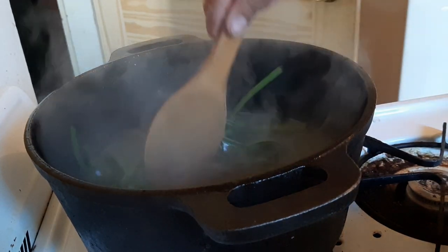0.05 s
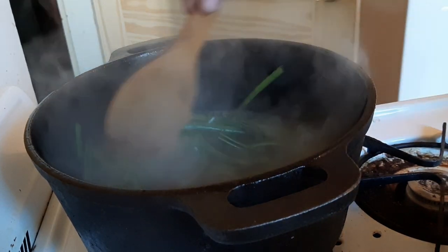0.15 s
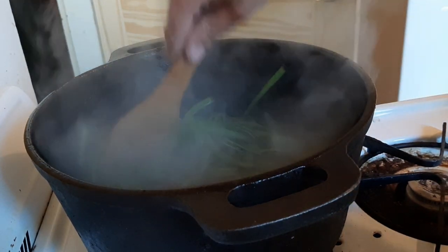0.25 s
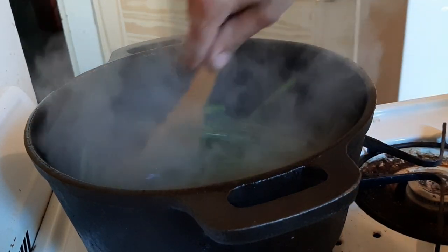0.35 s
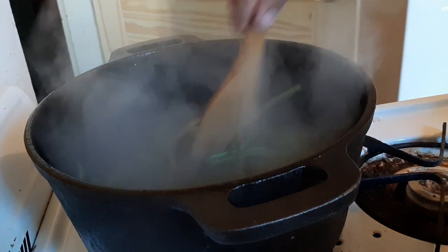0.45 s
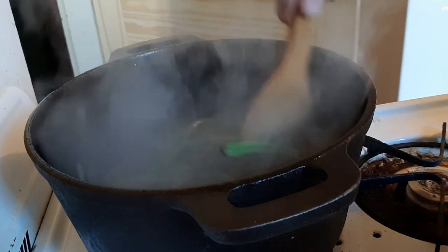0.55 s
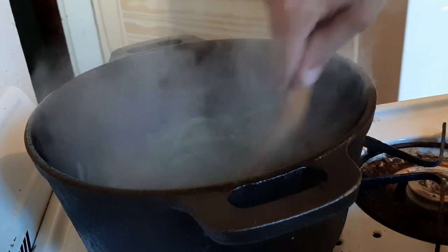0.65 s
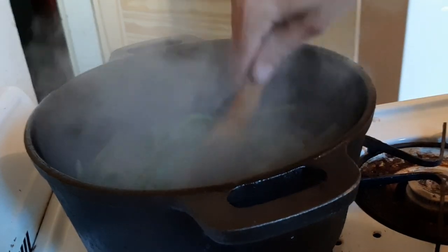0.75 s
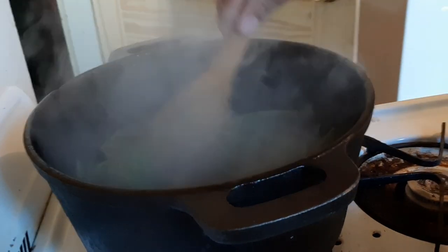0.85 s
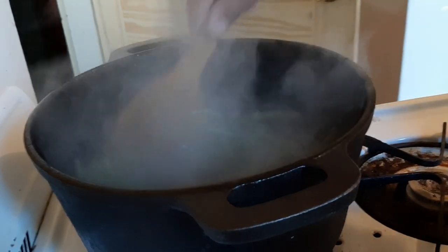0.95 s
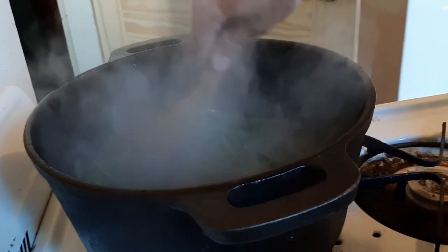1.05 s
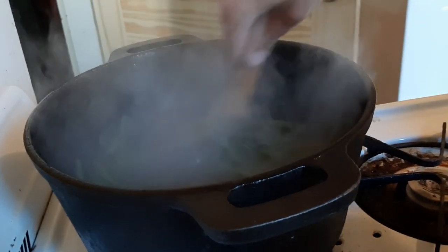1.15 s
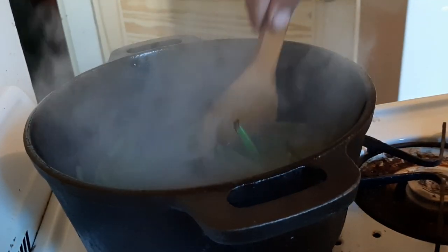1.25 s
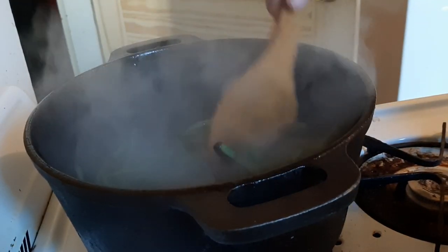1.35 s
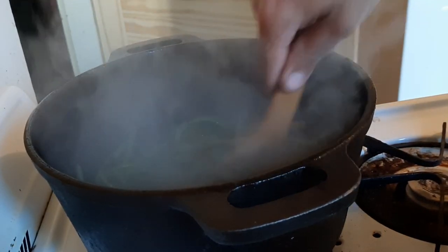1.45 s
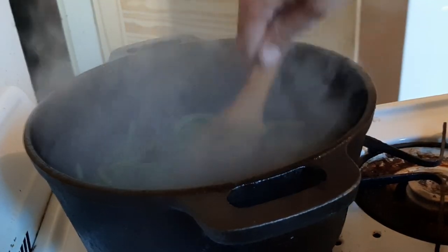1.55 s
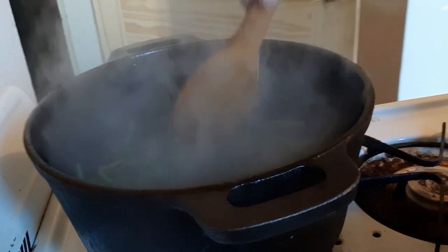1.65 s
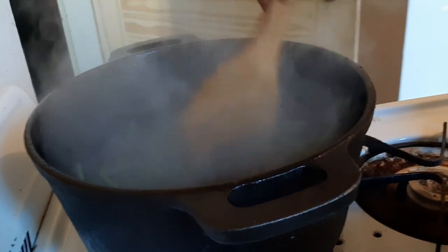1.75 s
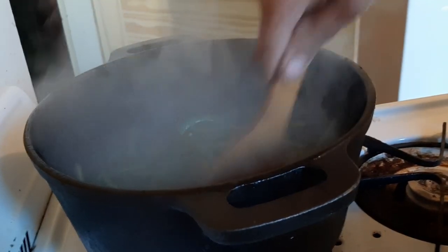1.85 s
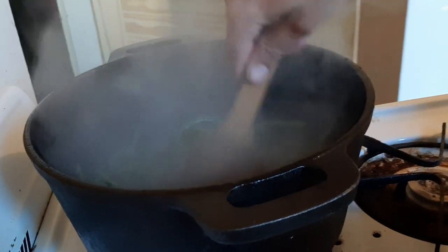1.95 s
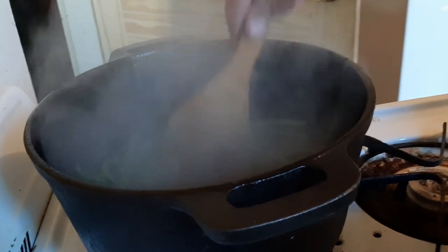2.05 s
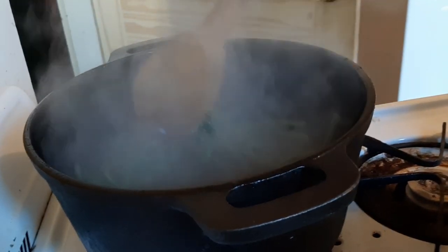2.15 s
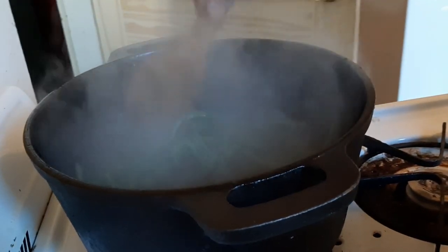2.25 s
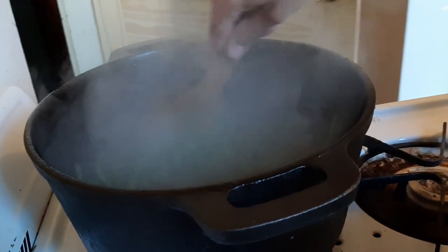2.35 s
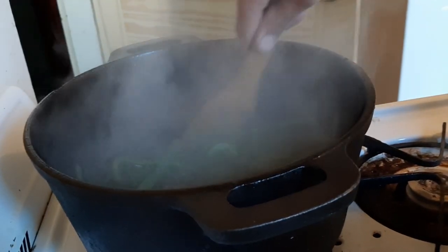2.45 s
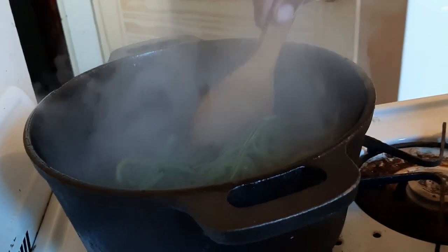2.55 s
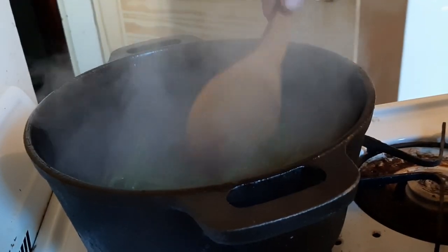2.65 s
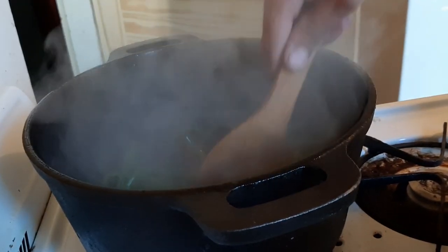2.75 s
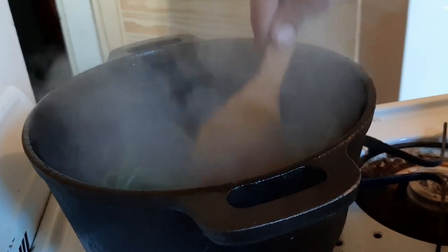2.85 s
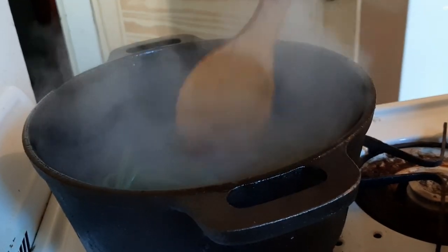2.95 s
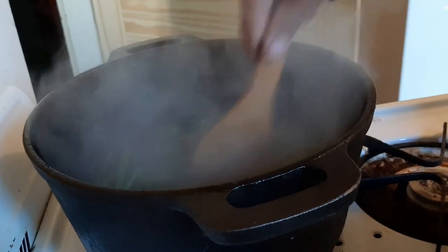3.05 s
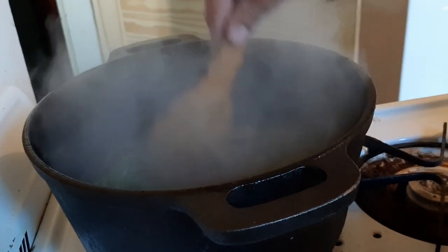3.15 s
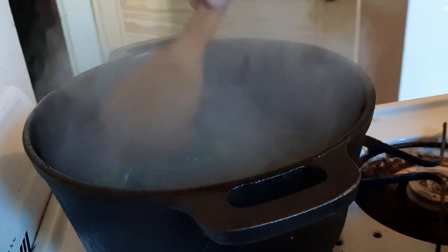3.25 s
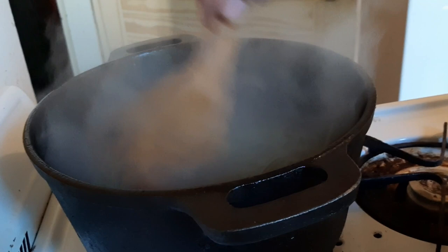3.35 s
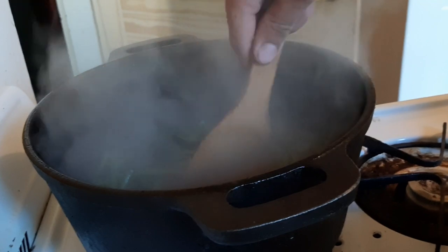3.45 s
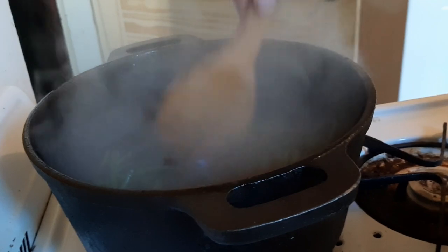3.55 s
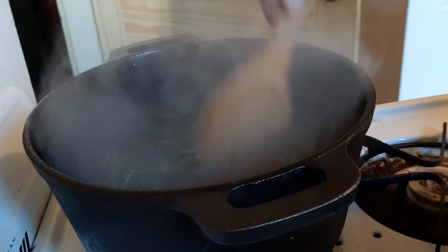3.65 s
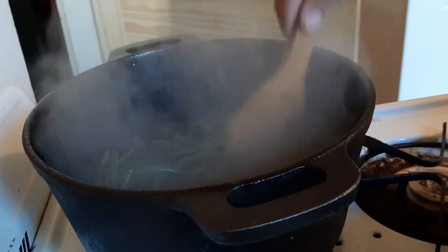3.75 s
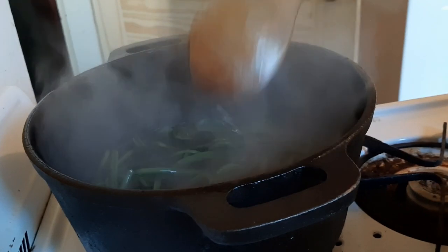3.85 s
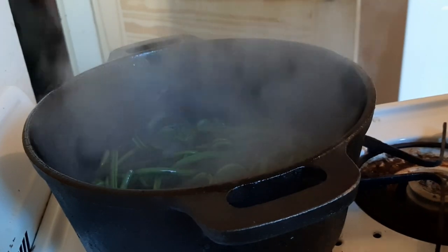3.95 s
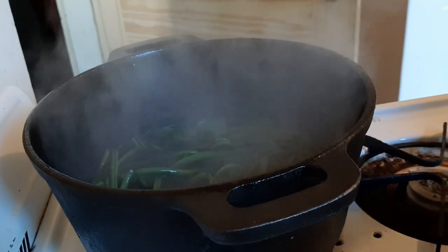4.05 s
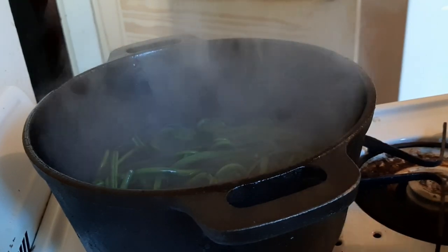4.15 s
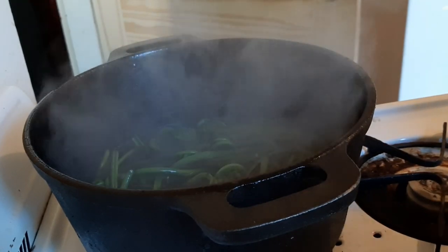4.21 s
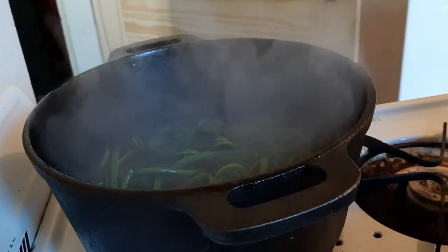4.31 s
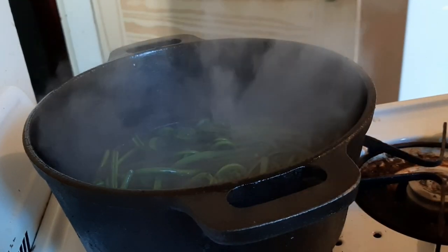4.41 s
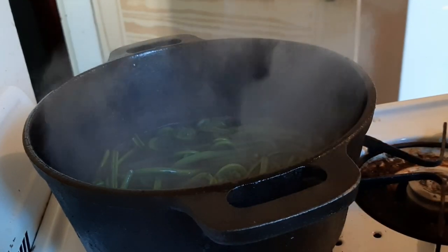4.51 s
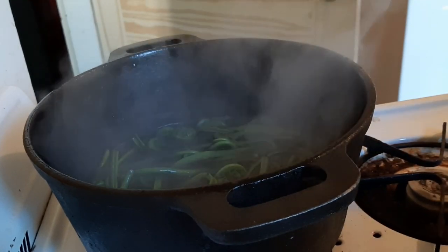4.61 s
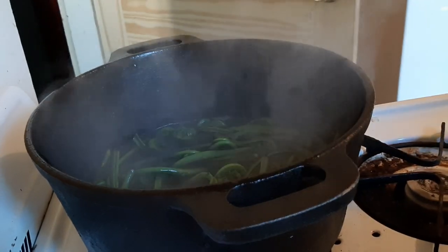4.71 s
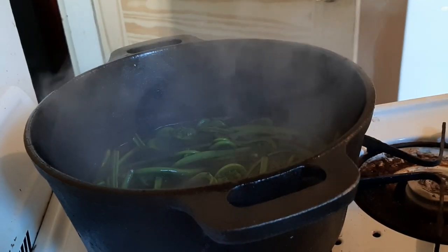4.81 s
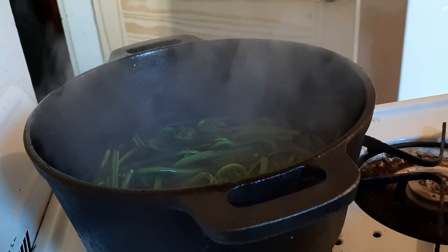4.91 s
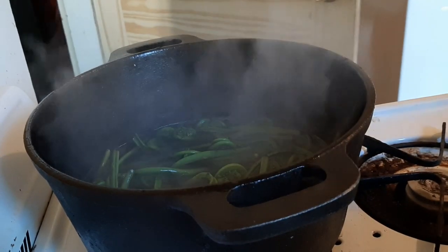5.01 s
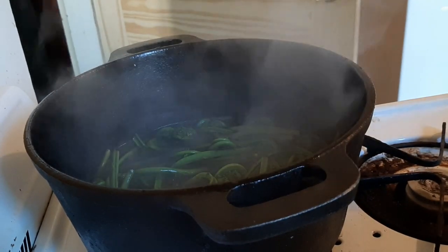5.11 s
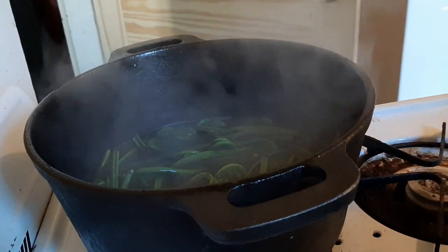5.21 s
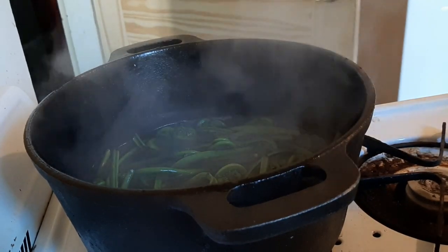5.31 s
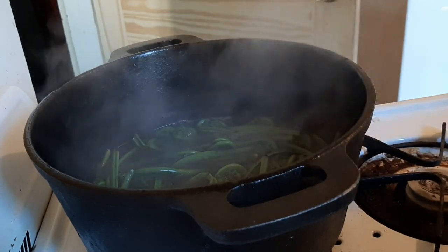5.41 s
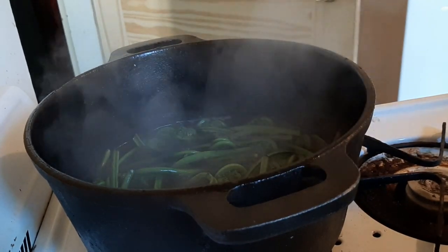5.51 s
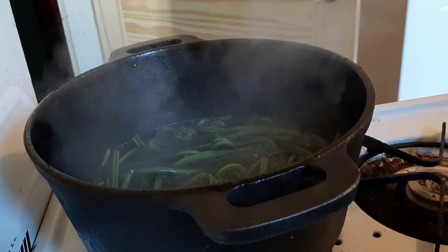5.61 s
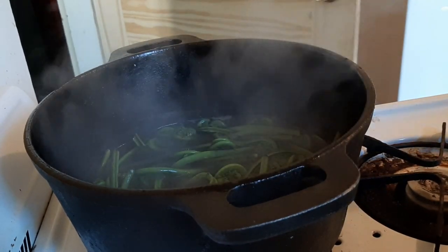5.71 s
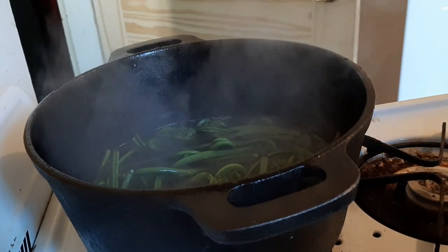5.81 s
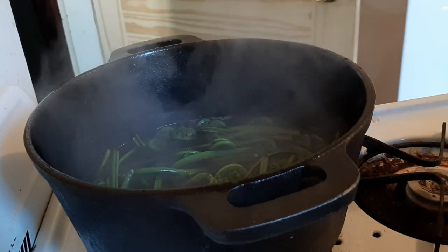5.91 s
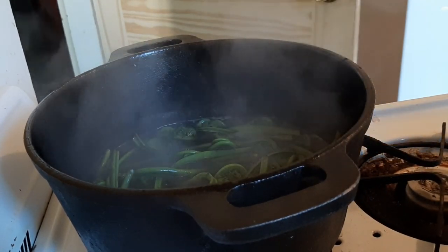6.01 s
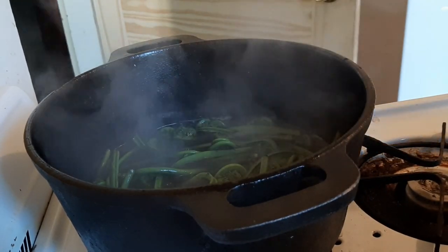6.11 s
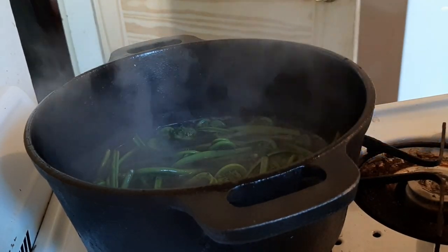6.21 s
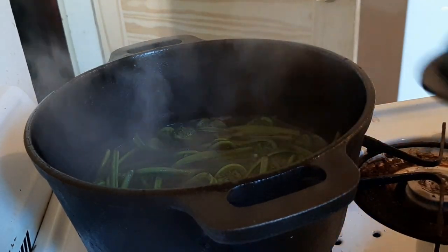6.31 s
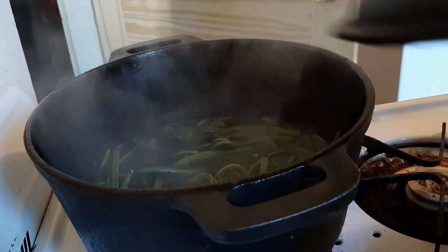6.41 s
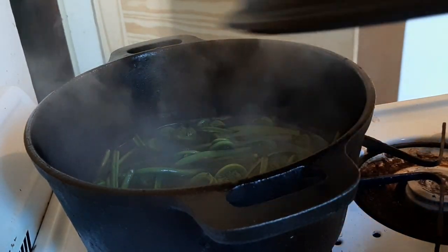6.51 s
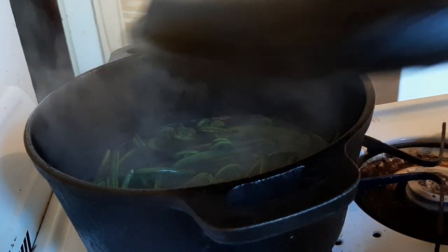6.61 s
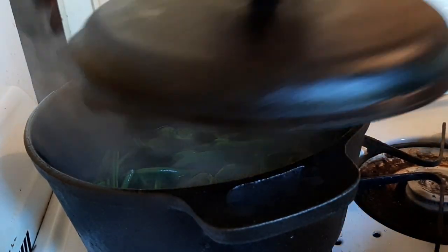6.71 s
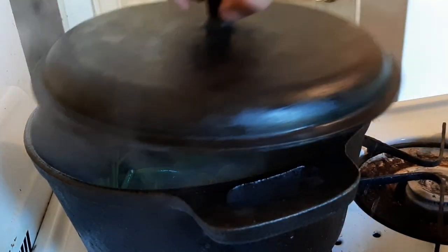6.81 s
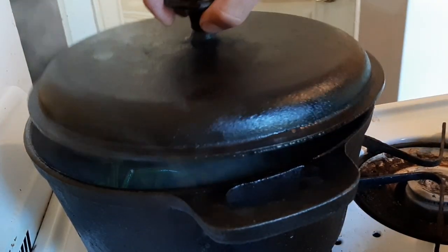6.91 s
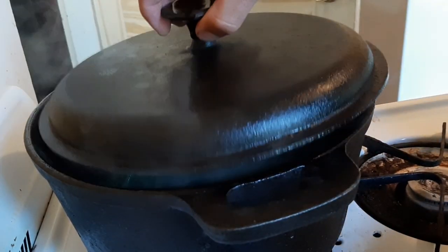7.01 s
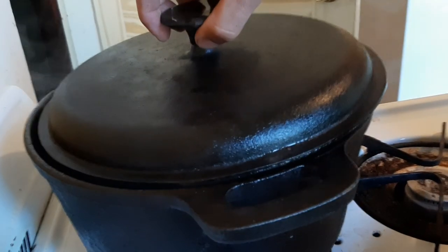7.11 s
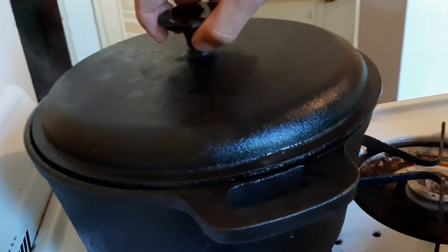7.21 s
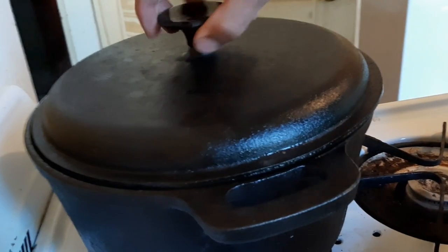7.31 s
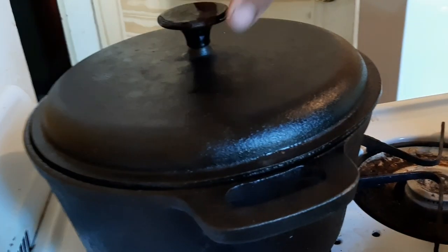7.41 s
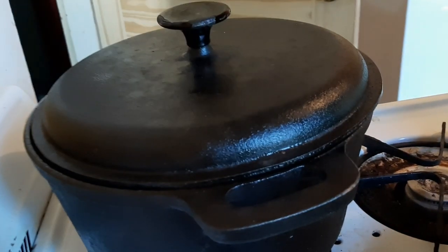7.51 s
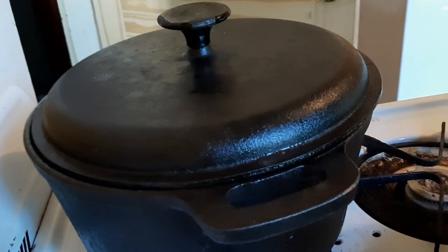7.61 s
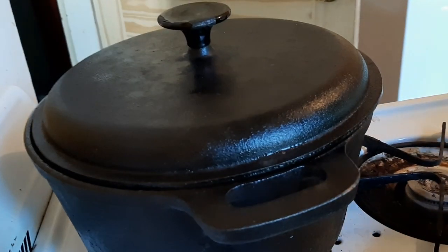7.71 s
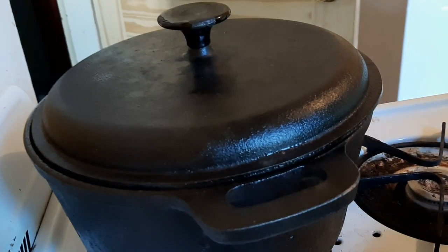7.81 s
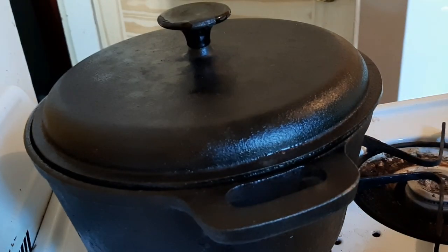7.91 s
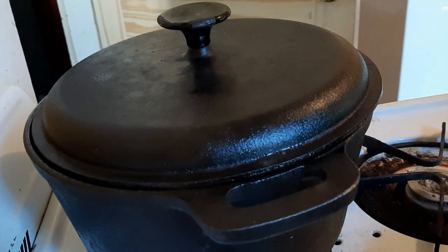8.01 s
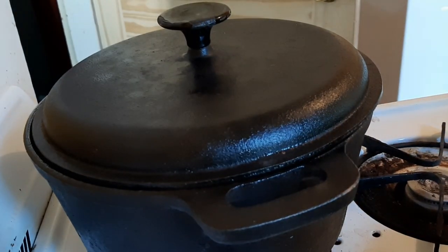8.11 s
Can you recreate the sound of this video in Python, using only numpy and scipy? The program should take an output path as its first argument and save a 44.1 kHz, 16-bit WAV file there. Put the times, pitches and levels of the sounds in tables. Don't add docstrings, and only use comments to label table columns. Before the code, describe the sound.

A close stereo view of a stove in a small, lightly echoing kitchen, with a steady low fan hum, soft rumble and airy simmer. From 0 to about 1 second a wooden spatula rasps over the floor of a cast iron pot, with hollow bumps near 0.8 and a faint squeak just before. At 1.1 a sharp, loud rim knock cracks. Rough scrapes and dull thuds return at 1.5 to 2.1, then a second, brighter rim knock at 2.3. Small wooden ticks and faint wet rustles continue until 3.8. Then mostly hum and simmer until a woody clack on the counter at 5.4. At 6.9 an iron lid touches lightly and rings, then clanks hard twice around 7.1, chatters quickly and seats by 7.3. A short metallic ring fades, the simmer is muffled, and quiet hum remains, with a tiny tick near 8.1.

```python
import sys
import numpy as np
from scipy import signal
from scipy.fft import rfft, irfft
from scipy.io import wavfile
from scipy.ndimage import uniform_filter1d

SR = 44100
rng = np.random.default_rng(int(sys.argv[2]) if len(sys.argv) > 2 else 0)


def decibels_to_gain(level_db):
    exponent = np.asarray(level_db, float) / 20
    return 10 ** exponent


def unload_audio(sound):
    columns = np.transpose(np.atleast_2d(sound))
    steps = np.round(np.clip(columns, -1, 1) * 32767)
    wavfile.write(sys.argv[1], SR, steps.astype(np.int16))


N = 359856

# frequency in Hz, likeness from 0 to 1.
PORT_LIKENESS = [(60, .95), (140, .98), (290, .7), (640, .25), (1400, .02), (15000, .01)]
# start in seconds, peak in dB, ring in dB, rattle decay in seconds, left over right in dB.
HARD_BLOWS = [
    (1.13, -3, -9.5, 0.0085, -4.5),
    (2.315, -11, -4, 0.0064, -3),
    (5.3659, -8, -9.5, 0.0068, -5),
    (6.939, -17, -6, 0.011, -3.5),
    (7.0864, -3, -6.5, 0.007, -1.5),
    (7.153, -3, -4, 0.0079, -3.5),
]
LID_MODE_HZ = [207, 6900, 622, 815, 940, 1019, 1270, 1465, 1525, 1733, 1869, 2076, 2429, 2592, 2756, 2895,
               7750, 3736, 4076, 4380, 4820, 5400, 5540, 6191, 3150, 3345, 5430, 6790, 7120]
# free T60 in seconds, then level in dB after the first touch,
# after the first clank, after the second clank, and under the rattle.
LID_MODE_LEVELS = [(0.57, -1.5, -4.5, -8, -9), (0.35, -19.5, -27, -23, -21), (0.39, -9, -12.5, -6, -23.5),
                   (0.56, -36, -25, -20.5, -10.5), (0.2, -33, -28, -10, -6.5), (3.1, -14.5, -4, -19, -14),
                   (0.13, -32.5, -16.5, 3.5, 0), (0.23, -16.5, -9.5, -19, 0), (0.18, -25.5, -36, -24, -11),
                   (0.62, -6, -4.5, -17.5, -3.5), (0.26, -3.5, -6, -1.5, 2.5),
                   (0.59, -12, -6.5, -6.5, -0.5), (1.5, -10.5, -9.5, -6, -24), (0.29, -30.5, -16.5, -2, -7),
                   (0.072, -28.5, -30.5, 8, -12), (1.5, -9.5, -13, -8, -6.5),
                   (.3, -43.5, -32.5, -29.5, -40.5), (1.1, -24.5, -19.5, -25.5, -32),
                   (0.33, -13, -16, -11.5, -11.5), (0.32, -19, -20, -12.5, -23),
                   (0.24, -24, -27.5, -7.5, -14.5), (0.21, -15, -16.5, -24.5, -27),
                   (0.25, -38, -25.5, -18.5, -22), (0.17, -42.5, -32, -28, -24.5),
                   (0.13, -29, -5, -13, -17), (0.34, -28.5, -14.5, -15, -14), (0.22, -36, -27, -16, -33),
                   (0.28, -35.5, -31.5, -34, -36), (.2, -39.5, -29, -32.5, -32)]


def evened(x):
    return x / np.sqrt(np.mean(x ** 2) + 1e-20)


def read(points, hz):
    f, value = np.transpose(points)
    return np.interp(np.log(hz + 1), np.log(f + 1), value)


def envelope(rows):
    t = np.arange(N) / SR
    s, db = np.transpose(rows)[[0, -1]]
    edge = np.clip(np.minimum(t - s[0], s[-1] - t) / 0.01, 0, 1)
    return decibels_to_gain(np.interp(t, s, db)) * edge


def swells(rows, rise):
    s, db, fade = np.transpose(rows)[..., None]
    late = np.arange(0, N + 64, 64) / SR - s
    elapsed = np.where(late > 0, late, -late / abs(rise))
    gain = decibels_to_gain(db - 20 * elapsed / np.maximum(fade, .01)).sum(0)
    return np.interp(np.arange(N) / 64, np.arange(len(gain)), gain)


def add(mix, s, sound):
    part = mix[..., round(s * SR):][..., :sound.shape[-1]]
    part += sound[..., :part.shape[-1]]


def click(points):
    gain_db = np.maximum(read(points, abs(np.fft.fftfreq(4096, 1 / SR))), -100)
    spectrum = np.exp(np.conj(signal.hilbert(np.log(decibels_to_gain(gain_db)))))
    taps = np.fft.ifft(spectrum).real[:2048]
    return taps / np.linalg.norm(taps)


def whitened(x):
    spec = rfft(x)
    power = uniform_filter1d(abs(spec) ** 2, size=61, mode="mirror")
    even = irfft(spec / np.sqrt(power + 1e-12), x.shape[-1])
    return even[:, :x.shape[-1] // 2]


def resonate(x, hz, width):
    r = np.exp(-np.pi * width / SR)
    return 2 * signal.lfilter([1 - r], [1, -r * np.exp(2j * np.pi * hz / SR)], x).real


def grit(per_s, spread_db):
    size = decibels_to_gain(spread_db * np.minimum(rng.exponential(1, N), 4)) * rng.choice([-1, 1], N)
    return evened(size * (rng.random(N) < per_s / SR))


def ring(modes, length, port_hz=900):
    t = np.arange(round(length * SR)) / SR
    hz, db, t60 = np.transpose(modes)[..., None]
    scatter = rng.uniform(-.6, .6, hz.shape) * np.pi * np.clip(hz / port_hz - .5, 0, 1)
    lag = 2 * np.pi * hz * 5 / SR + scatter
    decay = decibels_to_gain(db - 60 * t / t60)
    return np.array([(decay * np.sin(2 * np.pi * hz * t + phase)).sum(0) for phase in (0, lag)])


def stirring():
    # frequency in Hz, level in dB per Hz.
    rustle_colour = [(350, -30.5), (643, -3), (1510, -10), (2240, -8), (6030, -14.5), (8740, -14),
                     (11200, -15.5), (16000, -30.5)]
    # frequency in Hz, width in Hz, level in dB.
    floor_body = [(227, 70, 5.5), (280, 41, -1), (400, 80, 5.5), (648, 62, 2), (780, 58, -4.5),
                  (1530, 22, -7)]
    # peak in seconds, level in dB, seconds to fade 20 dB.
    drag_strokes = [(0.0, -46.5, 1.4), (.256, -27.5, -1.5), (.788, -26.5, 0.17), (.878, -40.5, -1.46),
                    (1.622, -22.5, 0.07), (1.986, -24, 0), (2.38, -48.5, 4)]
    # peak in seconds, level in dB, seconds to fade 20 dB.
    slow_pushes = [(0.282, -45.5, 0.25), (.55, -59.5, -6), (0.848, -60, 0.5), (1.06, -59, -1.5),
                   (1.91, -54, 0), (2.026, -54, 0.34), (2.778, -57.5, 0.18), (3.514, -49, -1),
                   (4.116, -65.5, 0.14), (5.136, -59, 0.5)]
    # peak in seconds, level in dB, seconds to fade 20 dB.
    quick_flicks = [(0.0, -52, 0.17), (.63, -60.5, 0.13), (1.612, -69, 0.4), (2.088, -45, 0.015),
                    (2.912, -65, 0.095), (3.124, -52, 0.37), (3.294, -56.5, 0.012), (3.46, -51.5, 0.15),
                    (3.734, -48, 0.085), (7.826, -58.5, 0.058), (1.725, -53, .03), (.98, -59, 0.038)]
    # peak in seconds, level in dB, seconds to fade 20 dB.
    wall_squeaks = [(.725, -55.5, 0.074), (.76, -62, .07)]

    crackle = np.array([grit(5500, 2.3), grit(5000, 5.0)])
    rustle = signal.oaconvolve(crackle, click(rustle_colour)[None], axes=1)[:, :N]
    slips = grit(560, 2.7)
    body = 0
    for hz, width, db in floor_body:
        body = body + decibels_to_gain(db) * evened(resonate(resonate(slips, hz, width), hz, 4 * width))
    squeak = evened(resonate(rng.standard_normal(N), 1470, 41)) * swells(wall_squeaks, 0.43)
    greens = rustle * (swells(slow_pushes, 0.37) + swells(quick_flicks, 0.052))
    return squeak + greens + decibels_to_gain(-14.5) * evened(body) * swells(drag_strokes, 0.3)


def touches():
    # start in seconds, peak in dB, ring in Hz, treble tick in dB.
    light_touches = [(0.172, -41.5, 1350, -54), (0.3534, -59, 1550, -54), (0.98, -56, 1310, -44),
                     (1.0482, -47, 1580, -51), (1.887, -48.5, 1614, -69), (1.96, -46, 1150, -66),
                     (1.981, -34, 1210, -62), (1.99, -33, 1090, -49), (1.999, -37, 1410, -49),
                     (2.029, -35, 2110, -43.5), (2.035, -40, 1360, -58), (2.06, -46, 4050, -60),
                     (1.613, -42, 2350, -62), (1.681, -48, 2340, -62), (2.093, -49, 4240, -60),
                     (2.093, -39, 1980, -56), (2.261, -44.5, 1315, -59), (2.273, -60, 1530, -48),
                     (2.374, -68, 1530, -35), (2.4178, -44, 1530, -41), (2.642, -49, 880, -63),
                     (2.773, -49, 1360, -53), (2.801, -45, 1210, -47), (2.9108, -42, 1056, -69),
                     (3.0886, -40.5, 3040, -64), (3.12, -28.5, 3790, -49), (3.121, -41.5, 2030, -64),
                     (3.13, -37, 3570, -52), (3.148, -43, 2010, -55), (3.187, -47, 1060, -62),
                     (3.238, -56, 2000, -47), (0.781, -40, 830, -51), (8.07, -68.5, 1400, -51.5),
                     (3.158, -37, 4000, -37), (3.2246, -42, 2020, -45), (3.29, -53, 2030, -44),
                     (3.457, -30.5, 1674, -69), (3.458, -37.5, 1138, -65), (3.455, -43, 3050, -66),
                     (3.464, -41, 1170, -68), (3.484, -47, 1680, -54), (3.531, -54, 2800, -43),
                     (3.5081, -37, 2710, -39), (3.736, -42, 2970, -46), (3.742, -36.5, 5100, -52),
                     (3.756, -52, 2800, -62), (3.775, -52, 3300, -58), (3.742, -35.5, 1086, -44),
                     (8.069, -63.5, 1410, -51.5)]
    wall_hz, wall_width_hz = 1530, 68
    out, t = np.zeros((2, N)), np.arange(4000) / SR
    lags = rng.uniform(-1.3, 0.94, len(light_touches))
    for (s, db, hz, tick_db), lag in zip(light_touches, lags):
        t60 = 0.018 + 0.065 / (1 + ((hz - wall_hz) / wall_width_hz) ** 2)
        t60 = max(t60 * min(1600 / hz, 1) ** 0.23, .003)
        tone = np.sin(2 * np.pi * hz * t + [[0], [lag]])
        octave = 0.21 * np.sin(2 * np.pi * 2.0 * hz * t)
        tock = decibels_to_gain(db - 60 * t / t60) * (tone + octave)
        noise = rng.standard_normal((2, len(t))) ** 3 / 4
        tick = signal.lfilter([1, -1], [1, -1.2, .6], noise) * decibels_to_gain(tick_db - 60 * t / 0.0068)
        add(out, s, tock + tick)
    return out


def bumps():
    # start in seconds, peak in dB, hardness in dB added above 500 Hz.
    floor_bumps = [(0.781, -35, 22), (0.794, -21, -12), (0.807, -43, -15), (0.824, -41, -8),
                   (.836, -30, -4), (0.869, -19.5, -22), (0.88, -33, 4), (1.511, -34, -13.5),
                   (1.574, -23, -33), (1.59, -35, 12), (1.611, -24.5, 3), (1.63, -20.5, -23),
                   (1.647, -41, -19), (1.679, -17.5, -13.5), (1.69, -21.5, -2), (1.701, -31, -17),
                   (1.72, -58, -19), (1.984, -30.5, -7), (2.03, -35, -5), (3.742, -37, -2)]
    # frequency in Hz, level in dB, T60 in seconds.
    floor_modes = [(220, 10, 0.03), (307.4, -12, 0.021), (394, -4, 0.15), (605, 5.5, 0.068),
                   (812.4, 2, 0.073), (1040, -14.5, 0.044), (1730, -10, 0.032), (2317, -11.5, 0.071)]
    out, (hz, db, t60) = np.zeros((2, N)), np.transpose(floor_modes)
    spots_db = rng.normal(0, 2.5, (len(floor_bumps), len(hz)))
    for (s, peak_db, hard_db), spot_db in zip(floor_bumps, spots_db):
        mode_db = db + spot_db + (hz > 500) * hard_db
        thud = ring(np.column_stack([hz, mode_db, t60]), .25)
        soft = np.minimum(np.arange(thud.shape[1]) / SR / 0.009, 1)
        add(out, s, decibels_to_gain(peak_db) * thud * soft / abs(thud).max())
    return out


def boom():
    # peak in seconds, level in dB, seconds to fade 20 dB.
    pot_rocks = [(.8, -39, 0.026), (.85, -48.5, 0.067), (2.378, -36.5, 0.034), (2.46, -45, 0.05)]
    tone = np.sqrt(2) * np.sin(2 * np.pi * 221 * np.arange(N) / SR)
    return tone * swells(pot_rocks, 1)


def blows():
    # frequency in Hz, level in dB per Hz.
    blow_colours = [
        [(60, -41), (360, -13), (560, -25), (800, -4), (1050, -14), (1500, 4), (2300, -2), (3300, -13),
         (6000, -26), (12000, -37), (16000, -51.5)],
        [(60, -16), (300, -10.5), (900, -17), (1500, -23.5), (1850, -3), (2200, 6.5), (2500, -1), (3200, -11.5),
         (4100, -4), (4700, -13), (5200, -16.5), (12500, -24), (16000, -29)],
        [(60, -44), (156, -10), (346, -5.5), (427, -0.5), (822, -6.5), (1150, -10.5), (1700, -4.5), (2600, -9),
         (3200, -14.5), (3900, -10.5), (5500, -14.5), (13000, -25), (16000, -48)],
        [(59, -45.5), (100, -1), (302, 1), (970, -14), (1420, 4), (2580, -26), (2930, -10.5), (6990, -33.5),
         (16000, -81.5)],
        [(59, -33.5), (100, -68.5), (373, -2.5), (721, -15), (1580, -3), (2270, -22), (2690, -5), (3540, -16),
         (6000, -32), (16000, -72)],
        [(59, -47.5), (100, -10), (381, -4), (854, -9.5), (1520, 6.5), (2220, -20), (2800, 2.5), (10700, -43.5),
         (16000, -96.5)],
    ]
    # frequency in Hz, level in dB, T60 in seconds.
    wooden_modes = [
        [(780, -5.5, 0.2), (830, -13.5, 0.11), (1410, 2, .12), (1506, 4, 0.18), (1646, -13, 0.067),
         (2070, -3, .07), (2164, 5.5, .06), (2380, -12, .06), (2580, -5.5, 0.051), (2800, -11, 0.12),
         (3348, -15, .1), (3800, -15.5, 0.061), (4547, -20, 0.075), (5255, -13, 0.074), (5970, -39, .08)],
        [(400, -3, .03), (1523, -14, 0.34), (2030, -11, 0.15), (2240, 0, 0.11), (2290, 11.5, 0.029),
         (2310, -3, 0.11), (2370, -12, .04), (2907, -1.5, .04), (3640, 3, .02), (3840, -13.5, .15),
         (4140, -11.5, 0.1), (4450, -11, .08)],
        [(105, -6, 0.64), (174.6, -2.5, 0.5), (255, -1.5, 0.8), (440, 5.5, 0.29), (545, -15, .15),
         (721, 4.5, 0.36), (828, 12, 0.23), (650, -16, 0.12), (347, -5, 0.14), (1210, -15, 0.22),
         (1580, -9, 0.1), (1590, 3, .07), (2350, -8, 0.07), (2570, 2, 0.06), (3850, 11, 0.068), (4300, -1, .07)],
    ]
    choke_times = [1.5, 2.7, 5.6, 7.085, 7.153, 7.29]
    # first contact over the rattle in dB, share sent to the walls in dB.
    contact_levels = [(10, -7), (12, -6), (-2, -2), (0, -6), (5, -9), (8, -9)]
    # delay in seconds, level in dB relative to the first contact.
    rebound_sets = [
        [(.0085, -10), (.0185, -15), (.027, -16.5)],
        [(.0095, -15.5), (.0245, -17.5), (.033, -8.5), (.038, -16.5)],
        [(.008, 1), (.019, -8), (.03, -6)],
        [(.004, -8.5)],
        [(.006, 1), (.013, -3), (.034, -9)],
        [(.003, -1.5), (.014, -5), (.021, -0.5)],
    ]

    out, t = np.zeros((2, 2, N)), np.arange(SR // 5) / SR
    free_t60 = np.array(LID_MODE_LEVELS)[:, 0]
    lid_modes = [np.column_stack([LID_MODE_HZ, np.array(LID_MODE_LEVELS)[:, k], free_t60])
                 for k in range(1, 4)]
    rows = zip(HARD_BLOWS, blow_colours, wooden_modes + lid_modes, choke_times,
               contact_levels, rebound_sets)
    for (s, db, ring_db, rattle, pan_db), colour, modes, end, (first_db, echo_db), rebounds in rows:
        sparse = rng.standard_normal((3, len(t))) * (rng.random(len(t)) < .15)
        both, left, right = sparse * np.exp(-t / max(rattle, .001))
        for delay, less_db in [(0.00056, 0.0056)] + rebounds:
            add(both, delay, decibels_to_gain(first_db + less_db) * np.hanning(8))
        burst = whitened(both + np.array([left, right]))
        crack = signal.fftconvolve(burst, click(colour)[None], axes=1)
        tone = ring(modes, end - s + .05)
        at = np.arange(tone.shape[1])
        tone *= np.clip((end - s - at / SR) / 0.0085 + 1, 0, 1) ** 2
        tone *= np.minimum(at / 14, 1)
        pan = decibels_to_gain([[pan_db / 2], [-pan_db / 2]]) * decibels_to_gain([[[0]], [[echo_db]]])
        add(out, s, pan * decibels_to_gain(db) * crack / abs(crack).max())
        add(out, s, pan * decibels_to_gain([[[0]], [[-6.0]]]) * decibels_to_gain(db + ring_db) * tone / abs(tone).max())
    return out


def lid():
    # time in seconds, pitch in Hz, level in dB.
    bell_path = [(6.95, 359.3, -49), (6.97, 358.7, -40.5), (7.1, 367.5, -23.5), (7.116, 345, -46),
                 (7.157, 374, -19.5), (7.213, 378.6, -33.5), (7.23, 359, -55)]
    # time in seconds, level in dB.
    chatter_level = [
        (7.165, -18),
        (7.201, -26),
        (7.229, -18.5),
        (7.27, -30.5),
        (7.33, -57.5),
    ]
    # frequency in Hz, level in dB per Hz.
    chatter_colour = [(47, -49), (100, -1), (150, -3.5), (230, 5), (702, -13), (1430, 0), (1900, -3.5),
                      (2270, -21.5), (2840, -17), (4940, -25), (5900, -35), (13400, -60)]
    # time in seconds, level in dB.
    clear_bounces = [(7.2116, 6.5), (7.218, -3), (7.2255, 7.5), (7.23, 4.5), (7.251, -12.5), (7.258, -7.5),
                     (7.232, 1), (7.24, -9), (7.268, -17.5), (7.29, -2.5)]
    # frequency in Hz, level in dB, T60 in seconds.
    lasting_modes = [(1725, -3, 0.9), (2427, 5, 0.52), (4820, -15.5, 0.42), (2895, -11.5, .45)]

    s, hz, _ = np.transpose(bell_path)
    pitch = np.interp(np.arange(N) / SR, s, hz)
    bell = np.sqrt(2) * np.sin(2 * np.pi * np.cumsum(pitch) / SR)
    bounces = grit(460, 1.7) + .5 * np.array([grit(500, 25.0), grit(410, 1.6)])
    bounces = bounces * envelope(chatter_level)
    for s, db in clear_bounces:
        add(bounces, s, decibels_to_gain(db) * np.ones((2, 1)))
    chatter = signal.oaconvolve(bounces, click(chatter_colour)[None], axes=1)[:, :N]
    held = [(f, row[-1], .2) for f, row in zip(LID_MODE_HZ, LID_MODE_LEVELS)]
    modes = ring(held, 0.17)
    modes = modes * np.minimum(np.arange(modes.shape[1]) / 16, 1)
    rung = signal.oaconvolve(bounces, modes / np.linalg.norm(modes[0]), axes=1)[:, :N]
    out = bell * envelope(bell_path) + decibels_to_gain(-4.0) * chatter + decibels_to_gain(-9.0) * rung
    tone = ring(lasting_modes, .9, port_hz=1e6)
    rise = np.minimum(np.arange(tone.shape[1]) / SR / 0.13, 1) ** 2
    add(out, 7.22, decibels_to_gain(-30.5) * tone * rise)
    return out


def rim():
    contact_db = [-61, -39, -45.5]
    # frequency in Hz, level in dB, T60 in seconds.
    touch_modes = [(7752, -49.5, 5.0), (8495, -8, 0.69), (10200, 10, 0.16), (10310, -13, 0.16),
                   (11990, -19, 5.0), (14630, -21, 0.77)]
    # frequency in Hz, level in dB, T60 in seconds.
    clank_modes = [(8549, -13, 0.13), (9388, -17.5, 3.2), (9679, -11.5, 0.36), (10200, -21, 5.0),
                   (10330, 0.5, 0.023), (10780, -13, 0.24), (11160, -10.5, 0.4), (12020, -3, 0.081),
                   (12300, -14.5, 0.12), (12930, -9, 0.12), (13090, -18, 0.23), (13820, -16, 0.33),
                   (14650, -18, 0.35)]
    # frequency in Hz, level in dB, T60 in seconds.
    seat_modes = [(7747, 0, 0.069), (8479, -28, 1.1), (9076, -34.5, 5.0), (9405, -29, 0.16),
                  (10170, 1.5, 0.079), (10740, 0, 0.23), (11200, -19, 0.91), (12130, -40.5, 5.0),
                  (12970, -8, 0.42), (13650, -18.5, 0.12), (13850, -24, 0.41), (14840, -18, 0.34),
                  (15140, -19, 0.21)]
    out = np.zeros((2, N))
    for (s, *_), level_db, modes in zip(HARD_BLOWS[3:], contact_db, (touch_modes, clank_modes, seat_modes)):
        tone = ring([(hz, db, min(t60, .22)) for hz, db, t60 in modes], .3)
        add(out, s, decibels_to_gain(level_db) * tone * np.minimum(np.arange(tone.shape[1]) / SR / .003, 1))
    return out


def hum_line(hz, db, width):
    sway, swell = (evened(uniform_filter1d(uniform_filter1d(v, 4000), 4000))
                   for v in rng.standard_normal((2, N)))
    phase = 2 * np.pi * np.cumsum(hz + width * sway) / SR
    return np.sqrt(2) * decibels_to_gain(db + 2.6 * swell) * np.sin(phase)


def air():
    # frequency in Hz, level in dB per Hz.
    air_colour = [(25, -42), (60, -12), (95, -16), (160, -17), (250, -13), (450, -22), (630, -29),
                  (1420, -32), (1550, -28), (1890, -38), (3500, -38), (5200, -36), (11300, -40),
                  (16000, -46)]
    # frequency in Hz, level in dB, pitch wander in Hz.
    fan_tones = [(131.7, -55, 3.7), (177, -69, 5), (243, -77.5, 3.3)]
    # peak in seconds, rumble in dB.
    leaning = [(0.32, -52.5), (0.98, -53), (1.84, -57.5), (7.16, -52.5)]
    air_db, rumble_db, lean_fade_s = -56, -62.5, 0.43
    stir_db, stir_end_s = 3.5, 1.7
    shut_db, shut_s, shut_fade_s = -4, 7.3, 0.11

    frames, hz = N // 512 + 5, np.fft.rfftfreq(2048, 1 / SR)
    a, b, c, d, patches = rng.standard_normal((frames, 1025, 5)).T
    patches = evened(uniform_filter1d(uniform_filter1d(patches, 20, 0), 8, 1))
    same = np.clip(read(PORT_LIKENESS, hz), 0, 1)[:, None]
    left = a + 1j * b
    z = np.array([left, same * left + np.sqrt(1 - same ** 2) * (c + 1j * d)])
    z = z * decibels_to_gain(read(air_colour, hz)[:, None] + patches)
    low = hz[:, None] < 112
    rumble, wash = (evened(signal.istft(z * part, nperseg=2048, noverlap=1536)[1][:, :N])
                    for part in (low, ~low))
    hum = sum(hum_line(*line) for line in fan_tones)
    t = np.arange(N) / SR
    lively_db = stir_db * t / stir_end_s * (t < stir_end_s)
    muffled_db = shut_db * np.clip((t - shut_s) / shut_fade_s, 0, 1)
    wash_gain = decibels_to_gain(air_db + uniform_filter1d(lively_db + muffled_db, SR // 10))
    shaken = decibels_to_gain(rumble_db) + swells([(s, db, lean_fade_s) for s, db in leaning], 0.98)
    return decibels_to_gain([[-.6], [.6]]) * (wash * wash_gain + rumble * shaken + hum)


def room(x):
    # frequency in Hz, T60 in seconds.
    room_t60 = [(100, 0.21), (400, 0.47), (900, 0.39), (1500, 0.37), (2500, 0.37), (4000, 0.34),
                (12000, 0.19)]
    taps = np.zeros((2, SR // 2))
    at = np.arange(150, SR // 2 - 20, 20) + rng.integers(0, 20, (2, (SR // 2 - 151) // 20))
    np.put_along_axis(taps, at, rng.choice([-1., 1.], at.shape), 1)
    hz, t, z = signal.stft(taps, SR, nperseg=256)
    same = np.clip(read(PORT_LIKENESS, hz / 1.3), 0, 1)[:, None]
    z = np.array([z[0], same * z[0] + np.sqrt(1 - same ** 2) * z[1]])
    tail = signal.istft(z * decibels_to_gain(-60 * t / read(room_t60, hz)[:, None]), SR, nperseg=256)[1]
    spec = rfft(tail)
    broad, narrow = (uniform_filter1d(abs(spec) ** 2, size, mode="mirror") for size in (801, 41))
    tail = irfft(spec * np.sqrt(broad / narrow))
    echo = tail[:, :SR // 2 - SR // 10] / np.linalg.norm(tail[0])
    return signal.oaconvolve(x.mean(0)[None], echo, axes=1)[:, :N]


def ports(x):
    return np.array([np.roll(x[0], -5), x[1]])


def scene():
    soft = stirring() + touches() + bumps() + boom()
    hard, far = blows()
    iron = lid() + rim()
    direct = ports(soft + hard + iron + air())
    return direct + room(decibels_to_gain(-9.5) * soft + far + decibels_to_gain(-12.0) * iron)


def band_limit(x):
    return signal.sosfilt(signal.butter(12, 16460, fs=SR, output="sos"), x)


def record(dry):
    # frequency in Hz, gain in dB.
    port_notch = [(6500, 1.5), (7600, -1.5), (8590, -12), (9800, -5), (11000, 2.5)]
    hz = np.fft.rfftfreq(1024, 1 / SR)
    taps = signal.firwin2(1023, hz, decibels_to_gain(read(port_notch, hz)) * (hz < 15850), fs=SR)
    bass_cut = signal.lfilter(*signal.butter(2, 22, "high", fs=SR), dry)
    limited = 1.134 * np.tanh(bass_cut / 1.233)
    mix = signal.oaconvolve(limited, taps[None], "same", axes=1)
    return band_limit(mix)


dry = scene()
out = record(dry)
unload_audio(out)
```